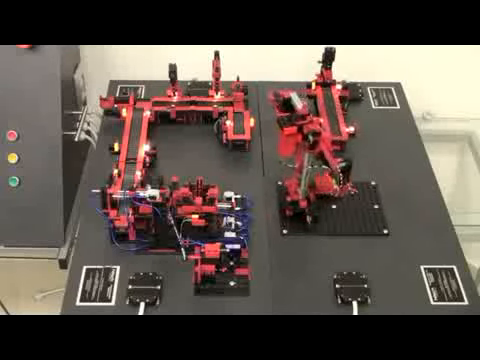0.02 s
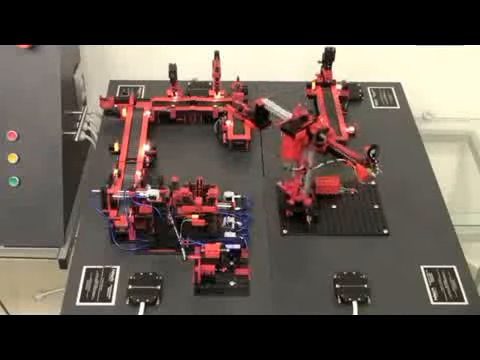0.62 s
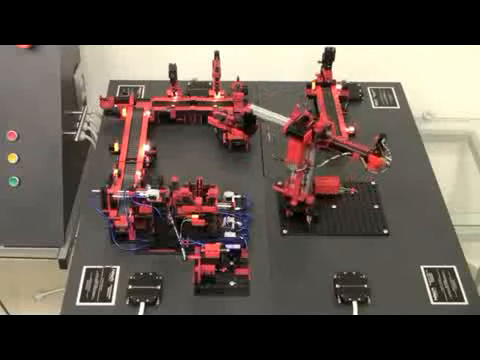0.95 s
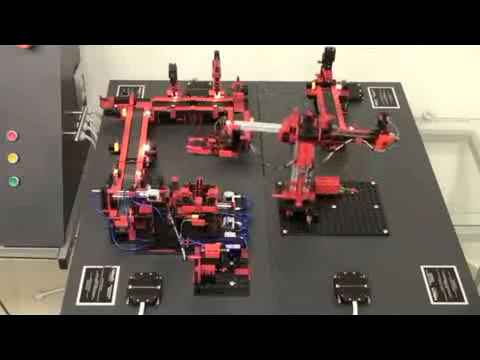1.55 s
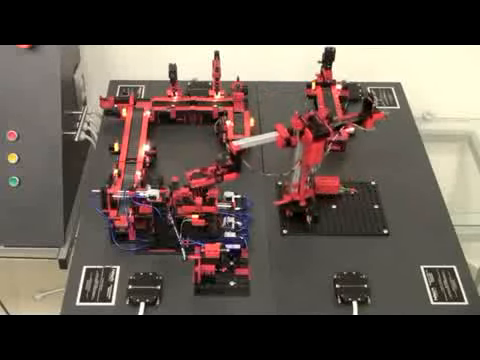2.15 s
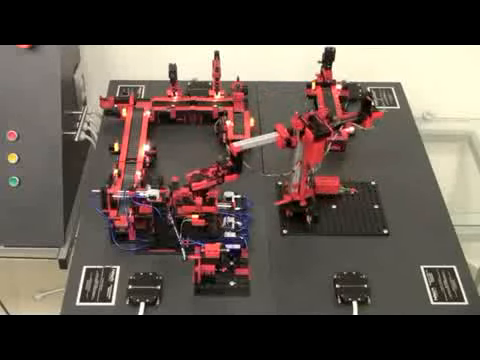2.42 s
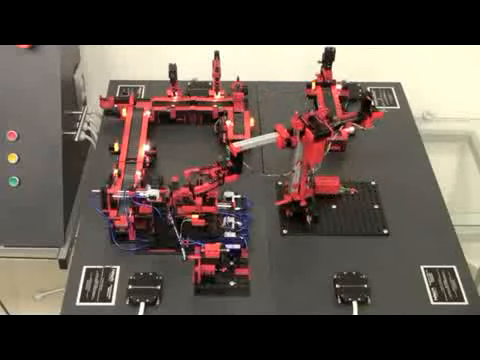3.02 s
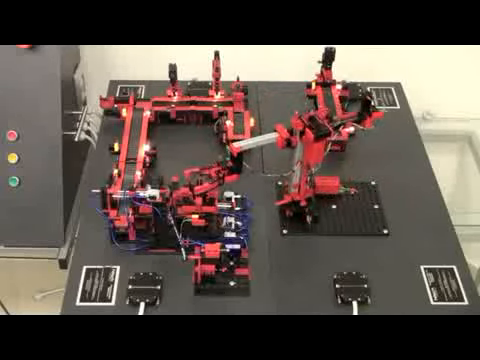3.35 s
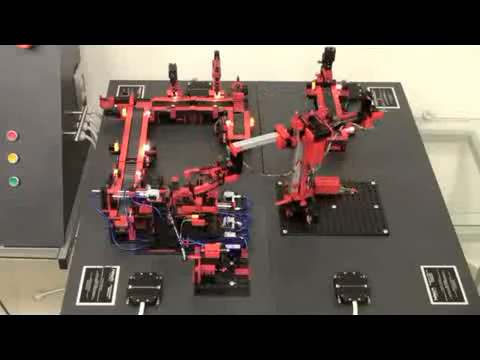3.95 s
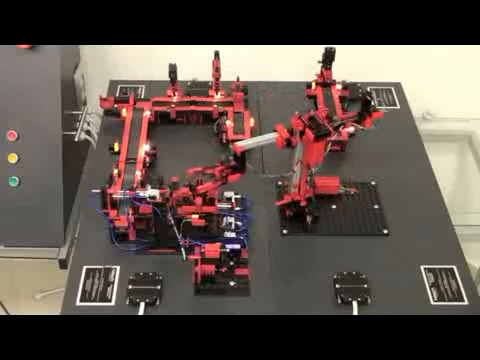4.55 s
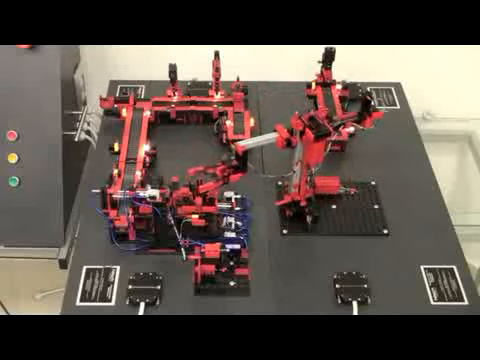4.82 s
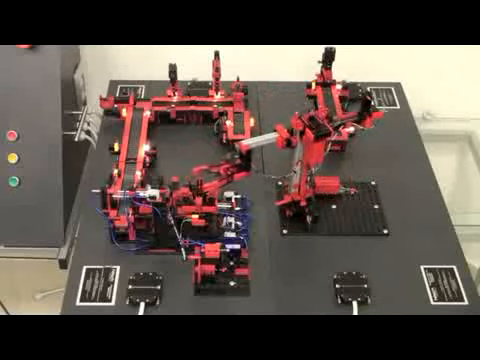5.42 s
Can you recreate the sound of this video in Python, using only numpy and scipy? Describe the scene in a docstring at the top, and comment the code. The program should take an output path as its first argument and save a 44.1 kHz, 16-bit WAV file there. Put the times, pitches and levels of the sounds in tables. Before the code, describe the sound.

A tabletop model factory whirs with a high wavering whine, rattles and snaps once, then pauses before buzzing with quick clicks.

```python
"""A hard-walled room, a tabletop model factory in front of a stereo pair of microphones.
A small geared motor swings the robot arm with a wavering whine. The gripper's drive rattles
briefly while the plastic arm thumps and snaps against its stop. After a pause the feed drive
starts buzzing, clicking once for each lobe of its cam. Ventilation hums underneath."""
import sys
import numpy as np
from scipy import signal
from scipy.fft import rfft, irfft, next_fast_len
from scipy.io import wavfile
from scipy.ndimage import map_coordinates

SR = 44100
rng = np.random.default_rng(int(sys.argv[2]) if len(sys.argv) > 2 else 0)


def generate_wav(sig):
    """Save sig (samples, or channels by samples) to the path in sys.argv[1] as 16-bit PCM at SR."""
    pcm = np.round(np.clip(np.atleast_2d(sig).T, -1, 1) * 32767).astype(np.int16)
    wavfile.write(sys.argv[1], SR, pcm)


N = 245637

# the swing motor's mean tooth-mesh pitch: time_s, pitch_hz
MESH_PITCH = [(0, 2440), (.1, 2510), (.21, 2448), (0.361, 2515), (.43, 2480), (.51, 2500), (1.15, 2534),
              (2.4, 2529), (2.81, 2529), (2.89, 2477)]
# the arm's blows on its stop: start_s, snap_db, thump_db, contact_cutoff_hz
STOP_BLOWS = [(3.189, -33.5, -24, 265), (3.239, -33, -33, 696), (3.2664, -14.5, -29.5, 1500),
              (3.271, -18.5, -36, 1500), (3.2756, -16, -32, 1500)]
CAM_FIRST_S, CAM_STEP_S = 4.8667, .0777  # the feed cam's first click; time from lobe to lobe


def swing_motor(tooth_count=14, flutter_rad=.45, stop_s=2.931, coast_t60=.065):
    """Hum, whine and gear noise follow one speed; each bind of the gear slows it and lifts the whine."""
    # mean whine: time_s, level_db
    whine_levels = [(0, -45), (.06, -26), (.13, -24), (.17, -35.5), (.25, -27.5), (.68, -27), (.95, -31),
                    (2.3, -32), (2.93, -32.8)]
    # gear train: time_s, shaft_tones_db, rattle_db, chatter_db
    train_levels = [(0, -41, -36.7, -39.5), (.8, -34, -35.5, -38), (1.6, -35, -37, -36.5),
                    (2.93, -37, -36.5, -34.5)]
    # shaft tones around the whine: harmonic, level_db
    shaft_tones = [(6, -14.5), (7, -18), (10, -11.5), (11, -4), (12, -11), (13, -3.5), (15, 3), (16, -6),
                   (17, -3), (19, -5), (20, -12.5), (21, -22), (22, -10.5), (24, -12), (27, -11)]
    # bright tooth rattle: frequency_hz, level_db
    rattle_spectrum = [(1650, -25.5), (2800, -5.5), (3250, -11), (3770, -8), (4300, -9.5), (5000, -12),
                       (5600, -11), (6250, -16), (7000, -11.5), (9200, -13), (10500, -17.5), (11400, -19.5),
                       (12100, -18)]
    # lower tooth chatter: frequency_hz, level_db
    chatter_spectrum = [(100, -20.5), (220, -4.5), (310, -9), (400, -17.5), (580, -10.5), (730, -8),
                        (880, -11.5), (1200, -4), (1500, -6), (2000, 1), (2500, 2.5), (3100, -11.5),
                        (4000, -16)]
    sag_hz, bind_db, dip_db = 13.7, 3.5, 6
    load, dips = gear_binding()
    mesh_hz = curves(MESH_PITCH)[0] - sag_hz * load
    whine_db = curves(whine_levels)[0] + bind_db * load - dip_db * dips
    tones_db, rattle_db, chatter_db = curves(train_levels)
    turns = np.cumsum(mesh_hz * (1 + .0013 * wobble(70))) / SR / tooth_count
    angle = 2 * np.pi * turns
    whine = np.sqrt(2) * amp(whine_db + 1.73 * wobble(45.2)) * np.sin(tooth_count * angle)
    # the rotor's unbalance shakes the table once a turn
    hum = np.sqrt(2) * amp(-48 + 1.86 * wobble(16)) * np.sin(angle + flutter_rad * wobble(25.26))
    # play between the teeth makes every shaft tone flutter
    tones = sum(amp(db + 3.1 * wobble(18)) * np.sin(harmonic * angle + flutter_rad * wobble(30.02))
                for harmonic, db in shaft_tones)
    rattle = teeth(turns, rattle_spectrum, beat_db=1.5, spiky_db=3.5)
    chatter = amp(chatter_db) * teeth(turns, chatter_spectrum, beat_db=-1.5, spiky_db=2.5)
    rasp = swing_rasp()
    gears = amp(tones_db) * unit(tones) + amp(rattle_db) * frame(rattle) + chatter + rasp
    coast = amp(-60 * np.maximum(np.arange(N) / SR - stop_s, 0) / coast_t60)
    return coast * hum, coast * whine, coast * gears


def gear_binding(turn_hz=7.27, tightest_s=.824):
    """An off-centre gear binds once a turn, so the whine swells in short peaks with broad lulls between."""
    # binding sets in as the arm swings out: time_s, depth
    onset = [(.62, 0.01), (.78, 1.0)]
    depth = curves(onset)[0]
    angle = 2 * np.pi * turn_hz * (np.arange(N) / SR - tightest_s)
    load = depth * (np.cos(angle) + .29 * np.cos(2 * angle))
    dips = depth * np.maximum(wobble(45) - .5, 0)  # the whine drops out briefly at random
    return load, dips


def swing_rasp():
    """Noise in a few bright resonances, strongest as the swing gets going."""
    # course of the rasp: time_s, level_db
    levels = [(0, -38.5), (.15, -35.5), (.7, -39.5), (1.1, -44)]
    # its resonances: pitch_hz, width_hz, level_db
    resonances = [(2960, 160, 2.5), (3376, 170, -0.5), (4198, 124, 3), (4355, 76, 6), (4860, 150, 4)]

    def ringing(hz):
        return sum(amp(db) * 1j * hz * width / (pitch ** 2 - hz ** 2 + 1j * hz * width)
                   for pitch, width, db in resonances)
    return amp(curves(levels)[0]) * unit(filtered(rng.standard_normal(N), ringing))


def arm_stop(attack_s=.008):
    """Soft bumps ring the low modes of arm and baseboard; then the plastic snaps home in a quick cluster of
    cracks."""
    # arm and baseboard: pitch_hz, level_db, t60_s
    board_modes = [(159, -14, 0.23), (209.3, -6.5, 0.264), (235.4, -2, 0.22), (287, -4, 0.32),
                   (487, -10.5, 0.37), (583, -2, 0.31), (698.4, -7, 0.3), (857, -4.5, .15)]
    # plastic snap: frequency_hz, level_db
    snap_spectrum = [(59, -34), (100, -3.5), (274, 2.5), (444, -9.5), (613, 1), (995, -11), (1170, -3),
                     (2460, -6.5), (2730, 0), (4160, -5.5), (5630, -1.5), (6230, -5), (7170, -5),
                     (12400, -34), (16100, -73), (22000, -120)]
    thumps, t = np.zeros(N + SR), np.arange(SR // 2) / SR
    for start_s, _, thump_db, cutoff_hz in STOP_BLOWS:
        ring = sum(amp(db - 60 * t / t60) / np.hypot(1, (hz / cutoff_hz) ** 2)
                   * np.sin(2 * np.pi * hz * t) for hz, db, t60 in board_modes)
        thumps[round(start_s * SR):][:len(t)] += amp(thump_db) * ring * (1 - np.exp(-t / attack_s))
    snaps = cracks([(s, db) for s, db, _, _ in STOP_BLOWS], snap_spectrum, t60=.025)
    return room(snaps, wet_db=-3.5) + room(thumps[:N], wet_db=-6)


def gripper_drive(on_s=2.96, off_s=3.765, turn_hz=29.7, catch_s=3.0705, strain_db=5.5):
    """A gearbox rattles, a loose tooth catching once a turn, and strains as the arm meets its stop."""
    # gearbox rattle: frequency_hz, level_db
    rattle_spectrum = [(820, -51), (1400, -16), (1760, -15.5), (2190, -3), (2600, -2.5), (3270, -11),
                       (3510, -3.5), (4970, -9.5), (6840, -3.5), (9320, -12), (11100, -11), (11700, -17),
                       (12400, -23), (16100, -53), (22000, -120)]
    # the loose tooth's tick: frequency_hz, level_db
    tick_spectrum = [(500, -20), (1700, -8.5), (2500, 2), (4500, -5.5), (6800, -1.5), (9000, -5.5),
                     (11000, -4.5), (12400, -10)]
    # the rattle grows as the gripper closes: time_s, gain_db
    closing = [(3.0, -1.5), (3.45, 1)]
    turns = turn_hz * (np.arange(N) / SR - catch_s) - .2
    level_db = -44 + curves(closing)[0] + strain_db * bump(STOP_BLOWS[-1][0], width_s=.074)
    rattle = amp(level_db) * teeth(turns, rattle_spectrum, beat_db=1.5, spiky_db=1)
    times = np.arange(catch_s % (1 / turn_hz), off_s, 1 / turn_hz)
    scatter = rng.standard_normal((len(times), 2))
    catches = [(s + .0015 * late, -34 + 1.5 * loud)
               for s, (late, loud) in zip(times, scatter) if s > on_s]
    ticking = cracks(catches, tick_spectrum, t60=.021)
    return running(on_s, off_s, attack_s=.023, release_t60=.25) * (rattle + ticking)


def feed_drive(on_s=4.76, loaded_s=4.865, scrape_hz=3450, scrape_db=-8):
    """The drive jolts into motion, throbs twice for each cam lobe and, under load, scrapes in fits."""
    # buzzing gears: frequency_hz, level_db
    rattle_spectrum = [(290, -35), (600, -20), (1100, -12), (1700, -12), (2300, -7), (2750, -9.5),
                       (3450, -1.5), (3950, -6.5), (4350, -2), (4850, -8), (5850, 0), (6600, -6),
                       (7250, -3), (10200, -6), (12100, -13.5)]
    t, end_s = np.arange(N) / SR, N / SR
    throbs = 2 * (t - CAM_FIRST_S) / CAM_STEP_S - .12
    rattle = teeth(throbs, rattle_spectrum, beat_db=2.5, spiky_db=1.5)
    squeak = filtered(rng.standard_normal(N), lambda hz: np.exp(-((hz - scrape_hz) / 230) ** 2))
    fits = amp(10 * np.tanh(wobble(80) - .3))
    scrape = amp(scrape_db) * unit(squeak * fits)
    jolt = amp(-44) * running(on_s, on_s, attack_s=.0026, release_t60=.4)
    free = amp(-52) * running(on_s, end_s, attack_s=.003, release_t60=1)
    loaded = amp(-47) * running(loaded_s, end_s, attack_s=.02, release_t60=1)
    return np.sqrt(jolt ** 2 + free ** 2 + loaded ** 2) * rattle + loaded * scrape


def tooth_and_cam_clicks(lobes=4, sway_s=.0032, cam_db=-31):
    """Loose teeth and the feed cam click sharply; hard surfaces close by reflect each click."""
    # loose teeth catching: start_s, level_db
    catches = [(3.175, -35), (4.7628, -40.5), (4.8264, -44)]
    # one click: frequency_hz, level_db
    click_spectrum = [(300, -26), (1200, -12), (2500, -12), (3500, -6.5), (5000, -5), (7200, 0),
                      (10500, -3.5), (12400, -14.5)]
    # near reflections: delay_s, gain_db
    echoes = [(.0021, -5), (.0048, -2.5), (.0068, -9.5), (0.0099, 0)]
    lobe = np.arange(10)
    # the off-centre cam runs a little late, then early, in every turn
    cam_times = CAM_FIRST_S + CAM_STEP_S * lobe + sway_s * np.cos(2 * np.pi * (lobe - .5) / lobes)
    cam_clicks = [(s, cam_db) for s in cam_times]
    clicks = cracks([*catches, *cam_clicks], click_spectrum, t60=.012)
    return filtered(clicks, lambda hz: 1 + sum(amp(db) * np.exp(-2j * np.pi * hz * delay_s)
                                               for delay_s, db in echoes))


def teeth(turns, spectrum, beat_db, spiky_db):
    """Tiny tooth impacts of uneven size, bunched once a turn, ringing in the plastic."""
    size_db = spiky_db * np.minimum(wobble(1500), 2) + beat_db * np.cos(2 * np.pi * turns)
    return unit(coloured(rng.standard_normal(N) * amp(size_db), spectrum))


def cracks(events, spectrum, t60):
    """Short plastic cracks: one dying noise burst for each (start_s, level_db)."""
    track, t = np.zeros(N + SR), np.arange(SR // 20) / SR
    for start_s, db in events:
        burst = rng.standard_normal(len(t)) * amp(-60 * t / t60)
        burst /= np.sqrt(np.sum(burst ** 2) / (t60 * SR / 10))
        track[round(start_s * SR):][:len(t)] += amp(db) * burst
    return coloured(track[:N], spectrum)


def frame(x, uneven_db=3.5, spacing_hz=70):
    """The frame's many small modes lift some narrow bands and swallow others."""
    ripple = uneven_db * rng.standard_normal(2000)
    return unit(filtered(x, lambda hz: amp(map_coordinates(ripple, [hz / spacing_hz], mode="mirror"))))


def ventilation():
    """Steady air, a low wavering drone a little stronger while the arm swings, and the feed drive's hum
    swelling once."""
    # moving air: frequency_hz, level_db
    air_spectrum = [(13, -42.5), (22, -16), (69, -11), (120, -5.5), (174, -6), (204, -14), (287, -11),
                    (385, -16), (428, -12.5), (746, -16), (851, -15.5), (946, -18), (1170, -18),
                    (1650, -21), (12400, -38.5), (16100, -86), (22000, -120)]
    # low drone: frequency_hz, level_db
    drone_spectrum = [(60, -38), (95, -8.5), (119, -5.5), (140, -13), (200, -26.5), (400, -65)]
    # the feed drive's swelling hum: frequency_hz, level_db
    boom_spectrum = [(70, -31), (120, 0), (165, -5), (200, -7), (320, -35)]
    air = amp(-51) * np.array([noise(air_spectrum), noise(air_spectrum)])
    swinging = running(0, MESH_PITCH[-1][0], attack_s=.01, release_t60=.3)
    drone = amp(-58.5 + 3.5 * swinging + 2 * wobble(5.09)) * noise(drone_spectrum)
    boom = amp(-47) * bump(centre_s=5.39, width_s=.16) * noise(boom_spectrum)
    return air + drone + boom


def room(x, wet_db):
    """Mid and side: the direct sound in the centre, the walls' diffuse tail 10 ms behind it."""
    # reverberation: frequency_hz, t60_s
    decay_times = [(100, 0.6), (500, 0.77), (3000, 0.63), (7000, 0.52), (12000, 0.28)]
    hz, t, bands = signal.stft(rng.standard_normal((2, SR)), SR, nperseg=256)
    tail = signal.istft(bands * amp(-60 * t / along(decay_times, hz)[:, None]), SR, nperseg=256)[1]
    tail = np.pad(tail / np.linalg.norm(tail[0]), ((0, 0), (SR // 100, 0)))
    mid, side = amp(wet_db) * signal.fftconvolve(x[None], tail, axes=1)[:, :N]
    return np.array([x + mid, side])


def amp(db):
    """Decibels to gain."""
    return 10 ** (np.asarray(db) / 20)


def unit(x):
    """Scale to rms 1."""
    return x / np.sqrt(np.mean(x ** 2) + 1e-20)


def along(points, hz):
    """Interpolate (frequency_hz, value) points on a log axis."""
    knots_hz, values = np.transpose(points)
    return np.interp(np.log(hz + 1), np.log(knots_hz + 1), values)


def curves(rows):
    """One value per sample for each column after the time."""
    times, *columns = np.transpose(rows)
    return [np.interp(np.arange(N) / SR, times, column) for column in columns]


def wobble(rate):
    """A smooth random curve, rate knots a second."""
    return map_coordinates(rng.standard_normal(int(N * rate / SR) + 4), [np.arange(N) * rate / SR])


def running(on_s, off_s, attack_s, release_t60):
    """Gain of a drive that runs up, holds and coasts down."""
    t = np.arange(N) / SR
    return np.clip((t - on_s) / attack_s, 0, 1) * amp(-60 * np.maximum(t - off_s, 0) / release_t60)


def bump(centre_s, width_s):
    """A bell-shaped rise and fall of height 1."""
    return np.exp(-((np.arange(N) / SR - centre_s) / width_s) ** 2)


def filtered(x, response):
    """Filter x by a gain given as a function of frequency."""
    size = next_fast_len(N + SR // 2)
    return irfft(rfft(x, size) * response(np.fft.rfftfreq(size, 1 / SR)), size)[..., :N]


def coloured(x, spectrum, size=4096):
    """Pass x through a causal filter of energy 1 with the given spectrum."""
    cepstrum = irfft(np.log(amp(along(spectrum, np.fft.rfftfreq(size, 1 / SR))) + 1e-6))
    cepstrum[1:size // 2] *= 2  # fold to minimum phase
    cepstrum[size // 2 + 1:] = 0
    kernel = irfft(np.exp(rfft(cepstrum)))
    return signal.fftconvolve(x, kernel / np.linalg.norm(kernel))[:N]


def noise(spectrum):
    """Noise of rms 1 with the given spectrum."""
    return unit(coloured(rng.standard_normal(N), spectrum))


def scene():
    """All drives stand on one table in front of the microphones; the rotor's hum arrives dry."""
    # stereo width: frequency_hz, side_gain_db
    width = [(60, -28), (160, -23.5), (350, -9), (700, -5.5), (1200, -6), (2500, -5.5), (5000, -9.5),
             (9000, -5), (10800, -3), (11600, -10)]
    hum, whine, gears = swing_motor()
    swing = room(whine, wet_db=-11) + room(gears, wet_db=-4.5)
    drives = room(gripper_drive(), wet_db=-5.5) + room(feed_drive(), wet_db=-3.5)
    clicks = room(tooth_and_cam_clicks(), wet_db=-5.5)
    mid, side = swing + drives + clicks + arm_stop() + ventilation()
    side = filtered(side, lambda hz: amp(along(width, hz)))
    balance = amp([[-.25], [.25]])
    return np.array([mid + side, mid - side]) * balance + hum


def record(dry):
    """The recorder squashes the highest peaks and keeps nothing above its band limit."""
    ceiling, top_hz = .35, 12170
    squashed = dry / (1 + (dry / ceiling) ** 4) ** (1 / 4)
    return filtered(squashed, lambda hz: hz < top_hz)


dry = scene()
out = record(dry)
generate_wav(out)
```